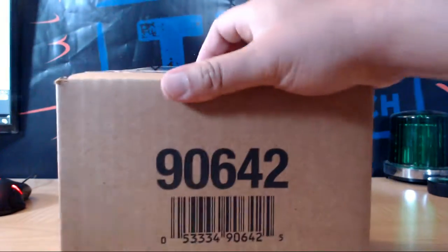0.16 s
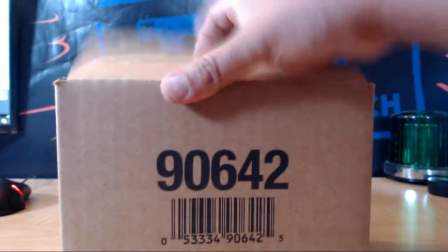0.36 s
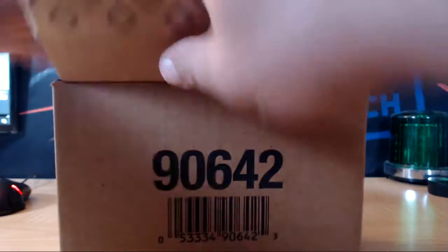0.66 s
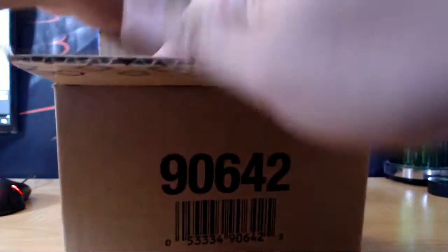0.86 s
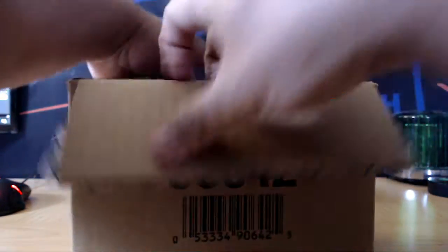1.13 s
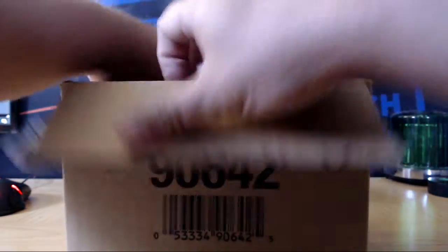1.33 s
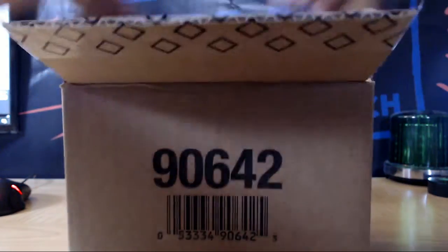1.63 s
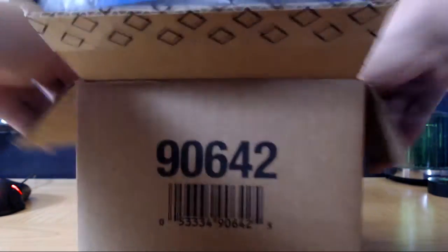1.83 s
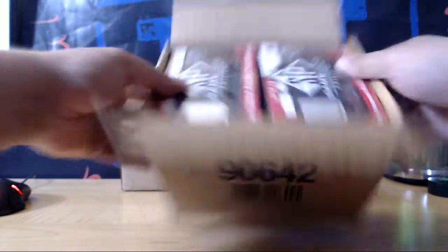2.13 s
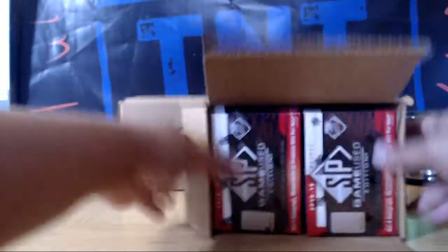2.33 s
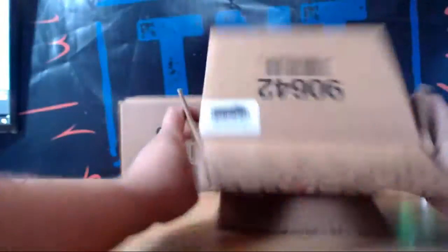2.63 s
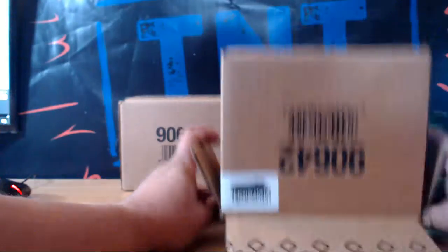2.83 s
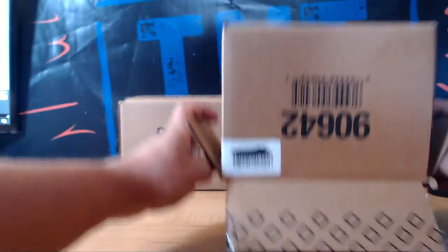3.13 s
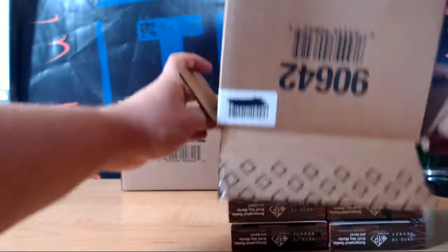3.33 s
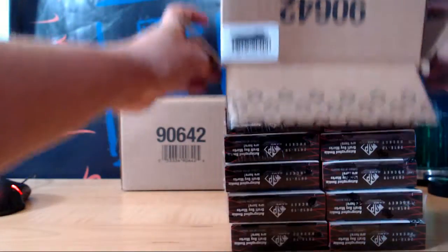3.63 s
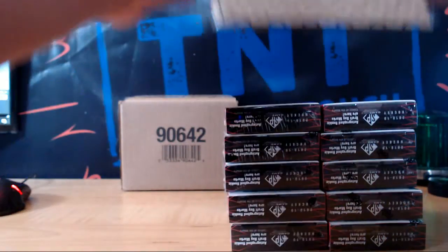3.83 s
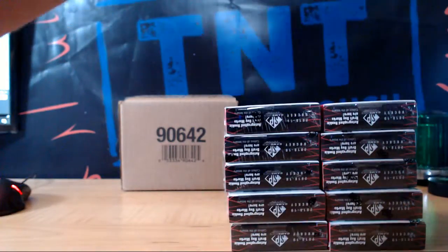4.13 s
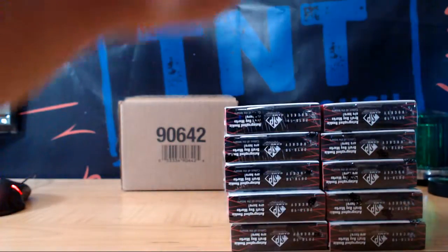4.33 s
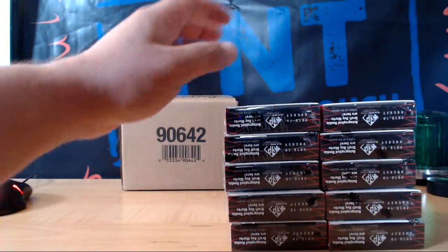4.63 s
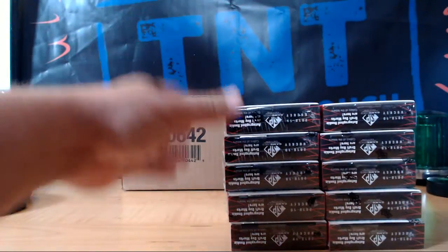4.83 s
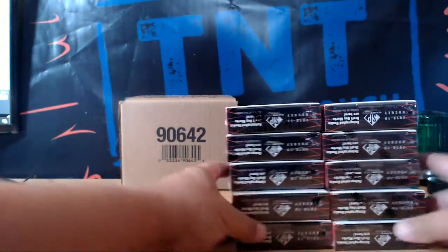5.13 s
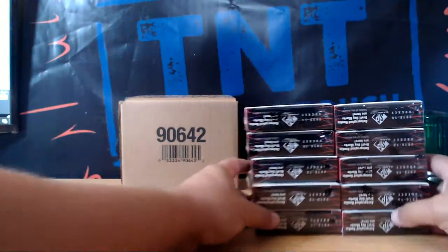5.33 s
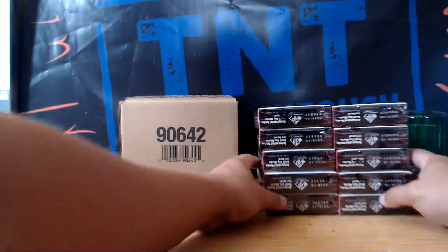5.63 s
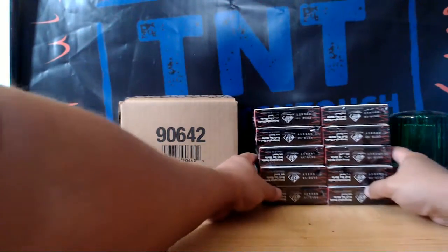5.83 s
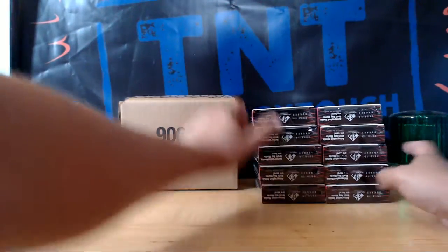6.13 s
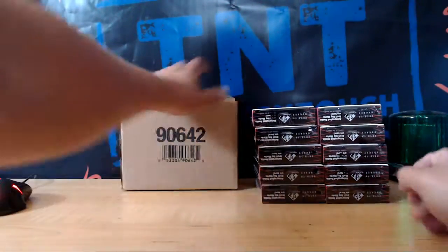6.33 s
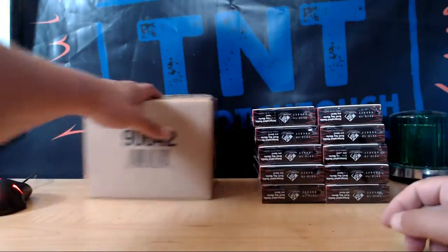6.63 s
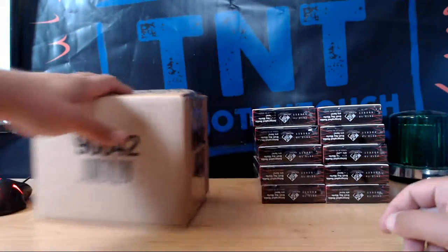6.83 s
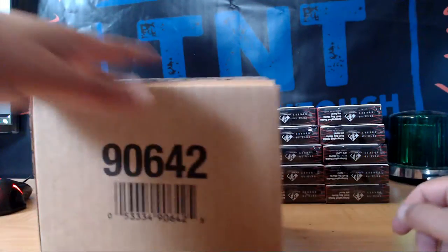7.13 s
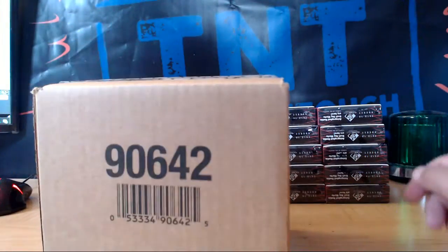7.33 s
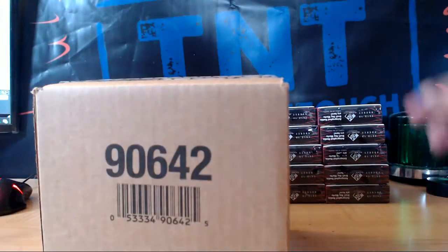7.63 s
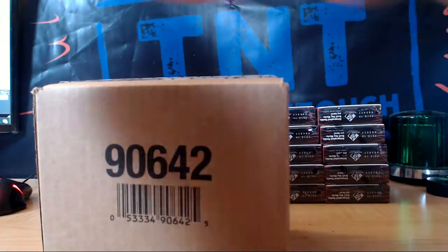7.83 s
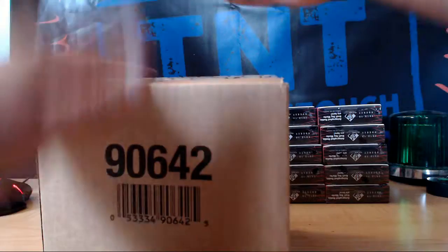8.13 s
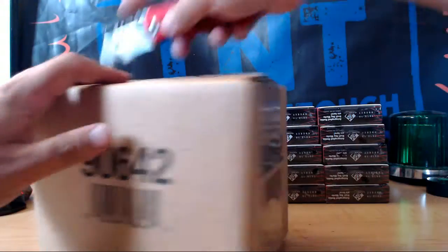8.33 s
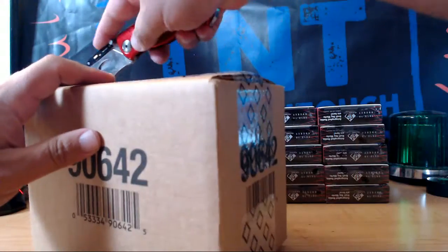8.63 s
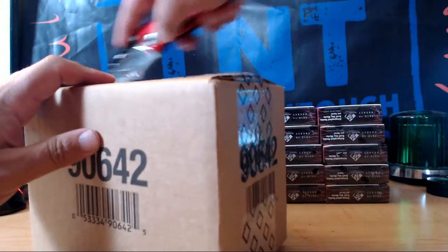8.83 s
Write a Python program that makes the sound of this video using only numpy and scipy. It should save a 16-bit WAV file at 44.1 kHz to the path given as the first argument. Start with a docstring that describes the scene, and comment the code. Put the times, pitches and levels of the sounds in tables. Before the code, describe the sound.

A close, dry take in a small room with faint air noise and barely audible computer hum. At 0.1-0.25 s tape gives small cracks and a louder pop; the cardboard lid springs, ringing and rattling briefly, with taps until 0.5. From 0.6 to 2.0 flaps rub and rustle softly with dull touches. At 2.1-2.2 the case lands in a strong, deep hollow thud, then cardboard shuffles, with knocks at 2.7 and 3.05 and fading scrapes. Light ticks come near 4.3. At 4.6-4.8 the empty case hits the floor below the desk: low boom, flaps clattering. From 5.0 a stack slides very softly, bumping at 6.2. A second case hushes across wood from 6.3, swelling near 6.9, and judders to a stop at 7.3. Quiet follows, with slight taps and shifting from 8.0. At 8.57 a knife pops the tape and rips it in short coarse jerks to the end.

```python
"""Tape pops under a knife first: a cardboard case stands on a desk in a small room. Its flaps are folded back, the
case is tipped over, pulled off a stack of wrapped boxes and dropped beside the desk. The stack is pushed away, a
second case slides forward, judders to a stop, and the knife stabs its tape and slits along the seam. Blows and
slips of friction are bursts of tiny random forces that ring modes of air and panels; the room answers each spot
with a desk bounce and a diffuse tail, over steady air noise and a faint computer hum."""
import sys
import numpy as np
from scipy import signal
from scipy.fft import rfft, irfft
from scipy.io import wavfile

SR = 44100
rng = np.random.default_rng(int(sys.argv[2]) if len(sys.argv) > 2 else 0)


def unload_wav(signal):
    """Save mono or channel-first audio to the path in sys.argv[1] as 16-bit WAV at rate SR, clipped to [-1, 1]."""
    wavfile.write(
        sys.argv[1],
        SR,
        np.round(np.clip(np.atleast_2d(signal).T, -1, 1) * 32767).astype(np.int16),
    )


N = 395577
TIME = np.arange(N) / SR
# clock in seconds of one short event
AGE = TIME[:SR * 2 // 5]
# samples from the start of a blow's sound to its landing
LANDING = SR // 50

# Bright spectrum of cracks and chattering edges. Each row: frequency in Hz, gain in dB.
CRACK_COLOUR = [(1200, -1.5), (2300, 0), (3600, -3), (4700, 2.5), (7300, -1), (9500, 1), (12500, 0),
                (16000, -8.5)]


def pops():
    """Tape gives way under the knife point with a short, bright crack."""
    # The point bursts through taut tape. Each row: landing in seconds, thump frequency in Hz,
    # thump level in dB, panel frequency in Hz, panel level in dB, crack level in dB.
    pop_rows = [(0.125, 150, -50, 696, -65, -49), (0.1556, 152, -58, 968, -49.5, -49),
                (0.173, 169.4, -45.5, 970, -46.5, -39), (0.2244, 201.5, -44, 1123, -30, -33.5),
                (8.572, 375, -40, 745, -36.5, -35)]
    contact_s = 0.0012
    return played((s, blow(contact_s, *colour)) for s, *colour in pop_rows)


def lid_ring(s=.2255, level_db=-33):
    """The lid, freed of its tape, springs up and rings in a few damped modes."""
    # Ring of the taut lid. Each row: frequency in Hz, relative level in dB, decay time T60 in seconds.
    lid_modes = [(1060, -2, 0.37), (1206, 4.5, 0.17), (1280, 0.5, 0.24)]
    out = np.zeros(N)
    for hz, db, t60 in lid_modes:
        ring = rng.choice([-1, 1]) * np.sin(2 * np.pi * hz * AGE) * dying(t60)
        add(out, s, from_db(level_db + db) * ring)
    return out


def rattling(s, level_db, fading_db_per_s, panel_hz, hollow_db, hiss_db):
    """Loose cardboard chatters in clumps of slips that fade as it comes to rest."""
    t, start_s = AGE - AGE[LANDING], .04
    fading = (t > 0) * from_db(-fading_db_per_s * t)
    slips = fading * friction(per_s=2000, spread_db=5, clump_db=7, clump_hz=70)
    sound = scrape(slips, start_s, level_db + hollow_db, panel_hz, level_db, level_db + hiss_db,
                   CRACK_COLOUR, hollow_hz=280, focus_db=11.5, flutes_db=-0.5)
    return played([(s, sound)])


def slitting():
    """The blade tears in coarse jerks through tape and paper, and drives mainly the lid's lower modes."""
    # The blade pulled along the tape. Each row: start in seconds, length in seconds, hollow level in dB,
    # panel frequency in Hz, board level in dB, rasp level in dB.
    slit_rows = [(8.584, 0.018, -48, 825, -47, -57), (8.63, 0.031, -64, 930, -52.5, -50.5),
                 (8.67, 0.018, -66, 800, -49, -47), (8.715, 0.027, -47.5, 593, -53, -56.5),
                 (8.75, 0.018, -51, 650, -55, -51), (8.776, 0.043, -51.5, 695, -48.5, -50.5),
                 (8.825, 0.049, -52.5, 700, -54.5, -48.5)]
    # Spectrum of the rasp at the blade. Each row: frequency in Hz, gain in dB.
    rasp_colour = [(1200, 2), (2200, 7), (3600, -4.5), (4600, 1), (6000, -1), (7400, -1.5), (8900, 0),
                   (11000, -2), (13000, -5), (16000, -16)]

    def slit(length, colour):
        slips = stroke(length) * friction(per_s=9000, spread_db=1.0, clump_db=3, clump_hz=110)
        return scrape(slips, length, *colour, rasp_colour, hollow_hz=410, focus_db=17, flutes_db=-10)

    return played((s, slit(length, colour)) for s, length, *colour in slit_rows)


def landings(rows):
    """Cardboard comes down and rocks back once, more softly."""
    rebound_s, rebound_loss_db, rebound_contact_s = 0.01, 4, 0.0064
    first = played((s, blow(seconds, *colour)) for s, seconds, *colour in rows)
    again = played((s + rebound_s, blow(rebound_contact_s, *colour, thump_db=-6.5))
                   for s, _, *colour in rows)
    return first + from_db(-rebound_loss_db) * again


def boom(s=4.7, hz=39, level_db=-36, t60=0.59, swell_s=0.0069):
    """The empty case falls flat and pushes out a deep puff of air, a damped low sine."""
    out = np.zeros(N)
    puff = np.sin(2 * np.pi * hz * AGE) * (1 - np.exp(-AGE / swell_s)) * dying(t60)
    add(out, s, from_db(level_db) * puff)
    return out


def fall():
    """The empty case hits the floor and its flaps rattle out, coloured by lying below the desk."""
    # It falls edge first, then flat. Each row: landing in seconds, contact time in seconds, thump frequency
    # in Hz, thump level in dB, panel frequency in Hz, panel level in dB, crack level in dB (before colouring).
    fall_rows = [(4.602, 0.0063, 78, -50, 1270, -60.5, -58.5),
                 (4.696, 0.015, 163, -36.5, 970, -33.5, -37.5),
                 (4.717, 0.0068, 176, -39.5, 1190, -36.5, -42.5)]
    # Colour of sound from below the desk. Each row: frequency in Hz, gain in dB.
    below_desk = [(70, 7.5), (140, 2), (260, 5.5), (520, 2.5), (800, -2.5), (1220, 2), (1450, -2.5),
                  (1900, -7), (3400, -2), (7000, -2.5), (13000, -4.5)]
    flaps = rattling(s=4.74, level_db=-48.5, fading_db_per_s=173, panel_hz=920, hollow_db=-11, hiss_db=-16.5)
    return boom() + coloured(landings(fall_rows) + flaps, below_desk)


def thumps():
    """Dull, low thuds, some soft touches and some the deep part of harder blows, move mainly the case's air."""
    # Each row: landing in seconds, thump frequency in Hz, thump level in dB.
    thump_rows = [(0.574, 89, -55), (0.619, 148, -60), (.72, 260, -62.5), (0.811, 86, -61.5),
                  (.875, 129, -57), (0.917, 280, -55.5), (1.081, 212, -53), (1.276, 98, -57),
                  (1.471, 214, -49), (1.588, 255, -53), (1.689, 118, -50), (1.836, 229, -69),
                  (2.192, 273, -36), (3.042, 372, -43.5), (3.082, 172, -42.5), (3.101, 235, -41),
                  (3.163, 320, -47.5), (3.399, 143, -54), (3.795, 265, -56), (4.762, 141, -37.5),
                  (4.779, 75, -39), (4.924, 320, -55), (5.045, 230, -62), (7.198, 138.7, -64),
                  (8.575, 96, -49), (8.691, 158, -44), (8.882, 100, -50.5)]
    return played((s, blow(0.0034, thump_hz=hz, thump=db, panel_hz=713, panel=db - 16,
                           crack=db - 23.5, thump_cycles=12.5))
                  for s, hz, db in thump_rows)


def taps():
    """Light, hard contacts of flap edges, nails and blade ring the panels."""
    # Each row: landing in seconds, panel level in dB, crack level in dB.
    tap_rows = [(0.249, -44, -60), (0.265, -42.5, -63), (0.28, -41, -45), (.294, -47.5, -67),
                (0.336, -51.5, -73), (0.357, -49.5, -59), (0.449, -53.5, -69), (0.499, -57.5, -68.5),
                (0.573, -59, -61.5), (0.866, -65, -77), (.917, -65.5, -72), (1.05, -63.5, -76),
                (1.471, -72, -66.5), (1.637, -56, -73), (1.687, -58.5, -62), (1.75, -61, -58.5),
                (1.975, -72, -72), (2.494, -61, -75), (2.59, -57.5, -66), (3.1, -47, -59),
                (3.864, -62.5, -60.5), (3.96, -71, -58.5), (4.877, -52, -63), (5.081, -64, -82),
                (6.918, -62, -69.5), (7.983, -55, -54), (8.259, -63.5, -54.5), (8.478, -68.5, -94),
                (8.69, -43, -76)]
    return played((s, blow(0.0027, thump_hz=330, thump=db - 4, panel_hz=900, panel=db, crack=crack))
                  for s, db, crack in tap_rows)


def judder():
    """The base of the sliding case sticks and slips on the desk until it stops."""
    # Each row: landing in seconds, panel level in dB.
    judder_rows = [(7.283, -62), (7.293, -53.5), (7.307, -56.5), (7.323, -48), (7.339, -54.5), (7.348, -56)]
    return played((s, blow(0.0045, thump_hz=308, thump=db - 7.5, panel_hz=1070, panel=db,
                           crack=db - 15, crack_hz=2580))
                  for s, db in judder_rows)


def handling():
    """Skin, flaps and boxes drag unevenly over the cardboard."""
    # Each row: start in seconds, length in seconds, hollow level in dB, panel frequency in Hz,
    # board level in dB, hiss level in dB.
    rub_rows = [(0.175, 0.043, -55, 1000, -53, -65), (0.412, 0.17, -65.5, 1130, -78, -76.5),
                (0.574, 0.053, -62.5, 1110, -66.5, -65), (0.668, 0.1, -72, 905, -74, -65.5),
                (0.828, 0.04, -60, 790, -61, -64), (0.896, 0.059, -62.5, 800, -70.5, -63.5),
                (.965, 0.067, -75, 700, -73.5, -65.5), (1.043, 0.11, -65.5, 930, -65.5, -64.5),
                (1.131, 0.09, -64, 1050, -66.5, -63), (1.266, 0.039, -63, 1200, -67, -67),
                (1.318, 0.027, -60.5, 990, -63.5, -57.5), (1.368, 0.085, -65, 850, -72, -72),
                (1.483, 0.12, -70, 900, -72, -68), (1.588, 0.077, -62.5, 850, -70, -62),
                (1.687, 0.089, -61.5, 840, -62.5, -57), (1.8, 0.079, -67, 750, -70, -65.5),
                (1.871, 0.082, -70.5, 804, -72, -64.5), (1.997, 0.14, -75, 1100, -65, -62),
                (2.094, 0.097, -56.5, 870, -56, -63), (2.209, 0.091, -63, 755, -58.5, -62),
                (2.358, 0.14, -77, 1070, -65.5, -63), (2.489, 0.093, -55.5, 810, -56, -61),
                (2.599, 0.12, -55, 800, -56, -64.5), (2.734, 0.08, -60, 680, -61, -70),
                (2.799, 0.021, -53.5, 715, -58.5, -72), (2.86, 0.1, -62.5, 830, -63.5, -69.5),
                (2.96, 0.091, -60, 920, -53.5, -63), (3.038, 0.075, -49, 805, -51.5, -61),
                (3.164, 0.047, -59, 805, -67, -64), (3.21, 0.098, -61.5, 770, -69.5, -74),
                (3.314, 0.078, -58.5, 950, -67, -73), (3.386, 0.075, -62.5, 965, -65, -68.5),
                (3.618, 0.18, -72, 860, -70.5, -70), (3.79, 0.058, -68.5, 800, -76, -72),
                (3.862, 0.13, -65.5, 970, -69.5, -66), (4.343, 0.12, -70, 840, -72, -68.5),
                (4.798, 0.068, -56.5, 850, -62, -62), (4.884, 0.024, -56.5, 1220, -58, -55),
                (4.911, 0.056, -60.5, 850, -58, -65), (4.964, 0.091, -65, 1000, -65.5, -76),
                (7.976, 0.017, -59, 696, -65.5, -59.5)]
    # Spectrum of the hiss at the rubbed surface. Each row: frequency in Hz, gain in dB.
    hiss_colour = [(1200, -1), (2200, 3.5), (3300, 1), (4600, 2.5), (6200, 1), (7500, 1.5), (10000, 2),
                   (12500, 1.5), (16000, -11.5)]

    def rub(length, colour):
        slips = stroke(length) * friction(per_s=7000, spread_db=2.5, clump_db=3.0, clump_hz=49.4)
        return scrape(slips, length, *colour, hiss_colour, hollow_hz=184, focus_db=-2.5, flutes_db=0.0)

    return played((s, rub(length, colour)) for s, length, *colour in rub_rows)


def creak(length, lower_hz, lower, upper_hz, upper):
    """Quick slips ring two resonances of a cut edge, which shift as the edge bends."""
    width, wander, wander_hz = 0.053, .03, 25.8  # shares of the pitch; how fast it wanders
    slips = stroke(length) * friction(per_s=2500, spread_db=1, clump_db=4.5, clump_hz=147)
    slips = through(slips, room())
    edge = 0
    for hz, db in ((lower_hz, lower), (upper_hz, upper)):
        ring = signal.lfilter(*signal.iirpeak(hz, 1 / width, fs=SR), slips)
        edge = edge + from_db(db) * rms_one(ring, length)
    bent = AGE + np.cumsum(wander * wobble(wander_hz)) / SR
    return np.interp(bent, AGE, edge)


def creaks():
    """Edges of cardboard or tape catch on each other, the boxes, the desk and the blade."""
    # Each row: start in seconds, length in seconds, lower resonance in Hz, its level in dB,
    # upper resonance in Hz, its level in dB.
    creak_rows = [(0.673, 0.015, 1830, -82, 4840, -66.5), (1.316, 0.012, 1750, -64, 4160, -63),
                  (1.731, 0.033, 1810, -59, 5800, -66), (2.006, 0.056, 1910, -63, 4430, -71),
                  (2.271, 0.01, 1790, -59, 4500, -75), (2.516, 0.068, 1840, -69, 4300, -62.5),
                  (2.701, 0.0072, 1637, -44, 2360, -75), (3.857, 0.013, 2020, -67, 3780, -63),
                  (7.314, 0.021, 1810, -61, 2540, -69.5), (8.335, .22, 2980, -82.5, 8440, -81.5),
                  (8.673, 0.015, 4350, -55, 9700, -52), (8.747, 0.0075, 8800, -50, 13300, -48),
                  (8.829, 0.041, 4900, -58.5, 12000, -52)]
    return played((s, creak(*colour)) for s, *colour in creak_rows)


def ticks():
    """Small snaps of tape, film and blade, too light to move the case."""
    # Each row: landing in seconds, level in dB.
    tick_rows = [(0.085, -59.5), (0.1078, -56), (0.185, -45), (0.24, -56), (0.9477, -53), (3.1923, -54.5),
                 (3.342, -56), (3.4184, -52.5), (4.237, -50.5), (4.2677, -53), (4.292, -56), (4.298, -52.5),
                 (4.433, -58.5), (8.0762, -55.5), (8.562, -42.5)]
    # Spectrum of a snap. Each row: frequency in Hz, gain in dB.
    tick_colour = [(500, -10.5), (1500, -4.5), (3000, -6.5), (5000, 5), (8000, 6), (12000, 8.5), (16000, 3)]

    def snap(db):
        force = contact(seconds=0.0011, per_s=3500, snap=2.2, rise_s=0.00037)
        return from_db(db) * rms_one(coloured(through(force, room()), tick_colour), .005)

    return played((s, snap(db)) for s, db in tick_rows)


def slide(pushes, colour, skew, speed_power):
    """A flat base glides over the desk: fine slips merge into a hush that swells and sinks with speed."""
    level = np.zeros(N)
    for s, length, db in pushes:
        speed = np.abs(np.sin(np.pi * np.linspace(0, 1, int(length * SR)) ** skew))
        add(level, s, from_db(db) * speed ** speed_power)
    slips = friction(per_s=5800, spread_db=-4.0, clump_db=1.17, clump_hz=23.2, size=N)
    return level * rms_one(coloured(slips, colour))


def blow(seconds, thump_hz, thump, panel_hz, panel, crack, thump_cycles=12, thump_db=0.0, crack_hz=7000,
         hollow_db=-4, spot_db=-10, spot_cycles=20):
    """A blow pumps the air in the case, rings its panels, most of all where it hits, and cracks on contact."""
    attack_s = .02
    space = room()
    force = through(contact(max(seconds, .001), per_s=9000, snap=2.1, rise_s=.0013), space)
    hollow, walls = cardboard(force, force, thump_hz, panel_hz, focus_db=10.5, flutes_db=-9.5,
                              seconds=attack_s)
    pump = butter(through(swing(thump_hz, thump_cycles), space), [0.44 * thump_hz, 600], "band")
    low = rms_one(pump, attack_s) + from_db(hollow_db) * hollow
    spot = rms_one(through(swing(panel_hz, spot_cycles), space), attack_s)
    walls = walls + from_db(spot_db) * spot
    # a blow that cracks little is a soft contact, so its crack is duller too
    dull = np.exp(-2 * np.pi * crack_hz * from_db(1.1 * (crack - panel)) / SR)
    high = signal.lfilter([1], [1, -dull], coloured(force, CRACK_COLOUR))
    return (from_db(thump + thump_db) * rms_one(low, attack_s)
            + from_db(panel) * walls
            + from_db(crack) * rms_one(high, attack_s))


def contact(seconds, per_s, snap, swell=0.45, rise_s=0.0012):
    """Grainy force of one blow: it swells up briefly, then dies away; a short contact snaps harder."""
    t = AGE - AGE[LANDING]
    grains = (rng.random(len(AGE)) < per_s / SR) * rng.standard_normal(len(AGE))
    rise = .5 + .5 * np.tanh(t / (swell * seconds + rise_s))
    force = grains * rise * np.exp(-np.maximum(t, 0) / seconds)
    force[LANDING] = snap * min(1, 0.0031 / seconds) ** 2
    return force


def swing(hz, cycles):
    """One damped swing that starts as the blow lands and falls 60 dB in the given cycles."""
    t = np.maximum(AGE - AGE[LANDING], 0)
    return rng.choice([-1, 1]) * np.sin(2 * np.pi * hz * t) * np.exp(-np.log(1000) * t * hz / cycles)


def scrape(slips, length, hollow, panel_hz, board, hiss, surface, hollow_hz, focus_db, flutes_db):
    """Fine slips hiss at the surface; with coarser jolts they shake the case. Every spot rings differently."""
    catch_hollow_db, catch_panel_db = -1, -6  # jolts against the fine slips
    spot = room()
    fine = through(rms_one(slips, length), spot)
    jolts = through(catches(length), spot)
    push = fine + from_db(catch_hollow_db) * jolts
    force = fine + from_db(catch_panel_db) * jolts
    air, walls = cardboard(push, force, hollow_hz, panel_hz, focus_db, flutes_db, length)
    rustle = rms_one(past_hand(coloured(fine, surface)), length)
    return from_db(hollow) * air + from_db(board) * walls + from_db(hiss) * rustle


def stroke(length):
    """Effort of one stroke of hand or blade: it builds up, holds and lets go."""
    attack_s = 0.0014 + 0.034 * length  # long strokes build up more slowly
    release_s = 0.01
    t = np.maximum(AGE - AGE[LANDING], 0)
    return (1 - np.exp(-t / attack_s)) * np.exp(-np.maximum(t - length, 0) / release_s)


def friction(per_s, spread_db, clump_db, clump_hz, size=len(AGE)):
    """Tiny slips of uneven size, coming in clumps as the surface catches and lets go."""
    sizes = from_db(spread_db * np.minimum(rng.exponential(1, size), 5)) * rng.choice([-1, 1], size)
    clumps = from_db(clump_db * np.clip(wobble(clump_hz, size), -2, 2))
    return (rng.random(size) < per_s / SR) * sizes * clumps


def catches(length, count=24):
    """A dragged edge catches on the flutes: jolts at uneven gaps, the first as the stroke begins."""
    mean_gap_s, spread_db = .028, 2
    gaps = mean_gap_s * rng.uniform(.3, 1.7, count)
    at = np.cumsum(gaps) - gaps[0]
    sizes = from_db(rng.normal(0, spread_db, count)) * rng.choice([-1, 1], count)
    jolts = np.zeros(len(AGE))
    jolts[LANDING + (at[at < length] * SR).astype(int)] = sizes[at < length]
    return rms_one(jolts, length)


def past_hand(x):
    """The bounce off a moving hand sweeps soft peaks through the hiss."""
    typical_delay_s, wander, wander_hz, echo = .00024, 0.27, 8.3, 0.35  # wander and echo are shares
    delay = typical_delay_s * np.exp(wander * wobble(wander_hz))
    return x + echo * np.interp(AGE - delay, AGE, x)


def cardboard(push, force, hollow_hz, panel_hz, focus_db, flutes_db, seconds, off_centre_db=7):
    """A push moves the air, a force bends the panels: modes over the dead, broad response of fluted board."""
    # Air and walls of the case. Each row: frequency in Hz, relative level in dB, decay time T60 in seconds,
    # the first two being middle values that vary by chance.
    hollow_modes = [(108, -16, 0.11), (137.5, -0.5, 0.17), (168, 0, 0.13), (215, -7, 0.053),
                    (230, -2, 0.14), (304, 8, 0.021), (366, -1, 0.061), (422.4, -4.5, 0.076)]
    # Bending modes of the panels, with the same columns: Hz, dB, seconds.
    panel_modes = [(510, -8.5, 0.013), (608, -5, 0.046), (586, -9.5, 0.036), (703, 1.5, 0.024),
                   (804, -3, 0.022), (930, -3.5, 0.017), (933, -7, 0.032), (1100, -12.5, 0.0081),
                   (1097, -9, 0.044), (1221, 0, 0.029), (1332, -9, 0.045), (1362, -9.5, 0.03),
                   (1786, -9, 0.052), (1930, -7, 0.038), (2290, -14.5, 0.025), (2900, -16, 0.014)]
    # Broad response of the fluted board. Each row: frequency in Hz, gain in dB before the off-centre loss.
    flute_colour = [(200, -28), (450, 0), (650, 4.5), (1200, 2), (1550, -1.5), (2100, -2), (2900, -7),
                    (5000, -17)]
    lowest_hz = min(0.55 * hollow_hz, 300)
    air = butter(through(push, ringing(hollow_modes, hollow_hz, focus_db=5.0)), lowest_hz, "high")
    walls = butter(through(force, ringing(panel_modes, panel_hz, focus_db)), 460, "high")
    # the loss is in dB per octave away from the panel's frequency
    board = coloured(force, [(hz, db - off_centre_db * abs(np.log2(hz / panel_hz))) for hz, db in flute_colour])
    dead_air = butter(push, [lowest_hz, 400], "band")
    low = rms_one(air, seconds) + from_db(flutes_db) * rms_one(dead_air, seconds)
    mid = rms_one(walls, seconds) + from_db(flutes_db) * rms_one(board, seconds)
    return rms_one(low, seconds), rms_one(mid, seconds)


def ringing(modes, centre_hz, focus_db):
    """Damped modes, random in sign, level and tuning; positive focus favours those near the contact's pitch."""
    hz, level_db, t60 = np.transpose(modes)[:, :, None]
    off_centre = np.sqrt(np.abs(np.log2(hz / centre_hz)))
    level_db = level_db - focus_db * off_centre + rng.normal(0, 1.0, hz.shape)
    hz = hz * rng.normal(1, .017, hz.shape)  # the grip detunes them
    strength = rng.choice([-1, 1], hz.shape) * from_db(level_db)
    return np.sum(strength * np.sin(2 * np.pi * hz * AGE) * dying(t60), axis=0)


def room(wet_db=-3.5, build_s=0.0012, desk_db=-9, desk_s=.0016):
    """Response from one spot: direct sound, a bounce off the desk, a diffuse tail that dies band by band."""
    # Reverberation of the small room. Each row: frequency in Hz, decay time T60 in seconds.
    room_t60 = [(130, 0.17), (1200, 0.22), (4000, 0.26), (11000, 0.19)]
    edges = np.geomspace(80, 18000, 6)
    white, tail = rng.standard_normal((2, len(AGE))), 0
    for k, band in enumerate(zip(edges, edges[1:])):
        t60 = at_hz(room_t60, np.sqrt(np.prod(band)))
        tail = tail + butter(white[k % 2], band, "band") * dying(t60)
    tail = tail * (1 - np.exp(-AGE / build_s))
    response = from_db(wet_db) * tail / np.sqrt(np.sum(tail ** 2))
    response[0] += 1
    # each spot has its own distance to the desk: half to double the delay
    response[int(desk_s * rng.uniform(.5, 2) * SR)] += from_db(desk_db)
    return response / np.sqrt(np.sum(response ** 2))


def room_tone():
    """Steady air noise, a slow deep rumble and a faint computer hum, each at a fixed rms level."""
    # Faint hum of a computer. Each row: frequency in Hz, rms level in dB.
    hum_tones = [(170, -88), (316, -88), (917, -88.5)]
    # Spectrum of the air noise. Each row: frequency in Hz, gain in dB.
    air_colour = [(20, 15), (80, 0), (350, -5), (600, -11), (1400, -12.5), (2200, -23), (5000, -25.5),
                  (16000, -25.5)]
    air_db, rumble_db = -68, -63
    hum = sum(from_db(db) * np.sqrt(2) * np.sin(2 * np.pi * (hz * TIME + rng.random()))
              for hz, db in hum_tones)
    # the first second lets the slow filters settle
    rumble = butter(butter(rng.standard_normal(N + SR), [4, 11], "band"), 41, "low")[SR:]
    air = coloured(rng.standard_normal(N), air_colour)
    return hum + from_db(rumble_db) * rms_one(rumble) + from_db(air_db) * rms_one(air)


def from_db(db):
    """Decibels to gain."""
    return 10 ** (np.asarray(db) / 20)


def rms_one(x, seconds=None):
    """Scale to rms 1, over the whole sound or over the first moments after a blow lands."""
    head = x if seconds is None else x[LANDING:LANDING + int(seconds * SR)]
    return x / np.sqrt(np.mean(head ** 2) + 1e-24)


def at_hz(points, hz):
    """Read a table on a log-frequency axis."""
    f, value = np.transpose(points)
    return np.interp(np.log(np.maximum(hz, 1)), np.log(f), value)


def through(x, response):
    """Pass a sound through an impulse response."""
    return signal.fftconvolve(x, response)[:len(x)]


def butter(x, hz, kind):
    """Butterworth filter, two poles per edge."""
    return signal.sosfilt(signal.butter(2, hz, kind, fs=SR, output="sos"), x)


def coloured(x, spectrum, size=2048):
    """Causal (minimum-phase) filter with the given spectrum."""
    gain = from_db(at_hz(spectrum, np.arange(size // 2 + 1) * SR / size))
    cepstrum = irfft(np.log(gain))
    # folding the cepstrum forward makes the response causal
    cepstrum[1:size // 2] *= 2
    cepstrum[size // 2 + 1:] = 0
    return through(x, irfft(np.exp(rfft(cepstrum))))


def dying(t60):
    """Exponential decay by 60 dB in t60 seconds."""
    return np.exp(-np.log(1000) * AGE / t60)


def wobble(hz, size=len(AGE)):
    """Slow chance, noise below the given frequency, with a spread of 1."""
    return rms_one(butter(rng.standard_normal(size), hz, "low"))


def add(out, s, sound):
    """Mix a sound in at time s."""
    start = int(s * SR)
    out[start:start + len(sound)] += sound[:N - start]


def played(blows):
    """Lay out (s, sound) pairs so that each blow lands, or each stroke starts, at its time."""
    out = np.zeros(N)
    for s, sound in blows:
        add(out, s - AGE[LANDING], sound)
    return out


def scene():
    """All the work on and beside the desk, heard in one room."""
    # A case or the stack lands on the desk. Each row: landing in seconds, contact time in seconds, thump
    # frequency in Hz, thump level in dB, panel frequency in Hz, panel level in dB, crack level in dB.
    landing_rows = [(2.087, 0.0089, 320, -43.5, 1490, -52, -66), (2.183, 0.0028, 296, -41, 900, -43.5, -54),
                    (2.191, 0.0045, 139, -25, 635, -41, -45.5),
                    (2.706, 0.0033, 144, -45.5, 657, -38.5, -52), (3.07, 0.0041, 255, -39, 877, -40.5, -54),
                    (5.168, 0.012, 213, -43, 1040, -57, -65.5),
                    (6.2, 0.003, 100.2, -37.5, 800, -46.5, -49.5)]
    # Pushes of the stack over the desk. Each row: start in seconds, length in seconds, dB at top speed.
    stack_pushes = [(5.0, 1.12, -67), (6.06, 0.82, -69)]
    # Pushes of the second case, with the same columns: seconds, seconds, dB.
    case_pushes = [(6.31, 0.98, -56), (7.97, 0.38, -70.5), (8.36, 0.41, -77)]
    # Spectrum of the sliding stack. Each row: frequency in Hz, gain in dB.
    stack_colour = [(100, -12), (210, -4), (280, -8), (500, -6.5), (800, -6), (1000, -2), (1250, 0),
                    (1550, -13.5), (1850, -9.5), (2200, -16.5), (5000, -16), (12000, -23), (16000, -29)]
    # Spectrum of the sliding case, with the same columns: Hz, dB.
    case_colour = [(150, -10), (450, 4.5), (900, 8), (1270, 11.5), (1600, 2.5), (1950, 9), (2400, 2.5),
                   (3300, 7.5), (5800, 9), (7400, 6), (9500, 7), (12500, 4), (16000, -1)]
    lid = rattling(s=.235, level_db=-42.0, fading_db_per_s=132.0, panel_hz=1247, hollow_db=-5.0, hiss_db=-16.5)
    knife = pops() + lid + lid_ring() + slitting()
    knocks = landings(landing_rows) + fall() + thumps() + taps() + judder() + ticks()
    stack = slide(stack_pushes, stack_colour, skew=0.39, speed_power=1.06)
    case = slide(case_pushes, case_colour, skew=0.65, speed_power=3.6)
    return (knife + knocks + handling() + creaks() + stack + case + room_tone())[None]


def record(dry):
    """A steep elliptic low-pass cuts the top above 16 kHz."""
    cutoff_hz = 16000
    return signal.sosfilt(signal.ellip(10, .2, 80, cutoff_hz, fs=SR, output="sos"), dry)


dry = scene()
out = record(dry)
unload_wav(out)
```